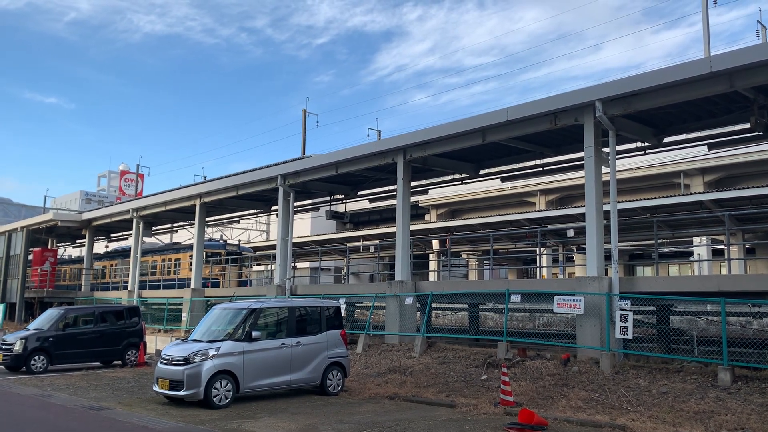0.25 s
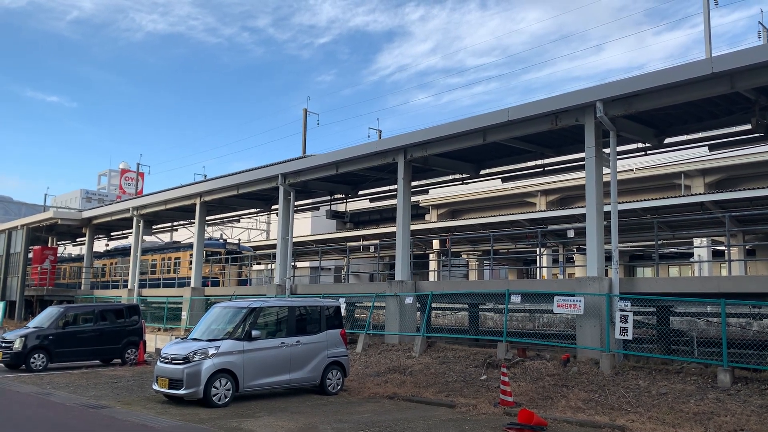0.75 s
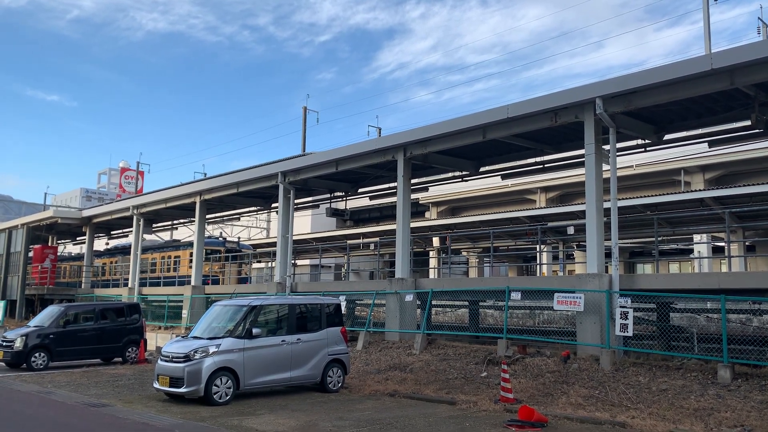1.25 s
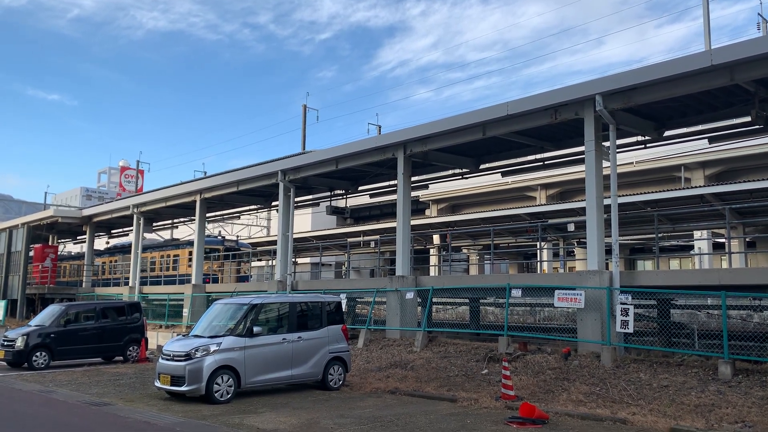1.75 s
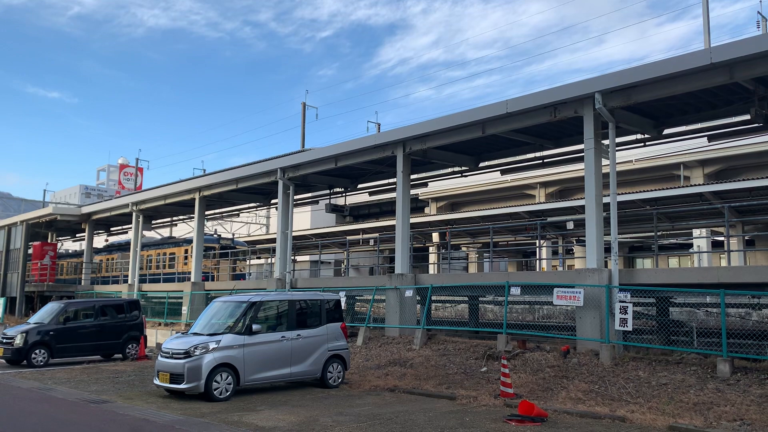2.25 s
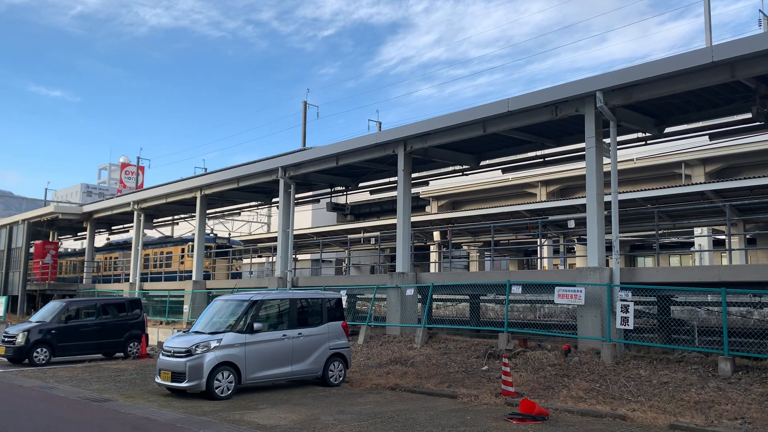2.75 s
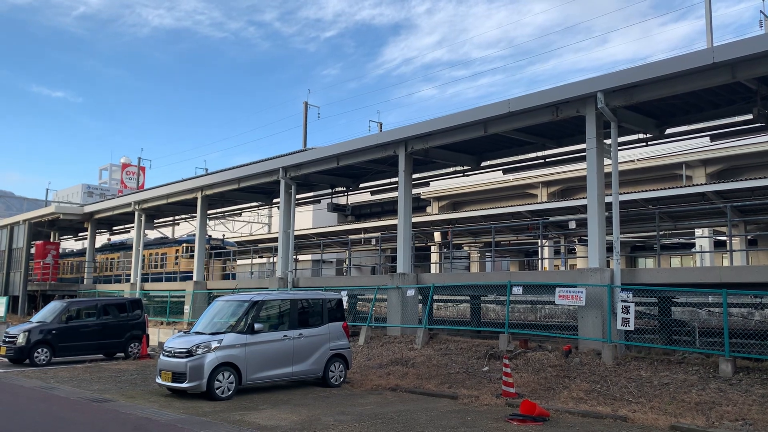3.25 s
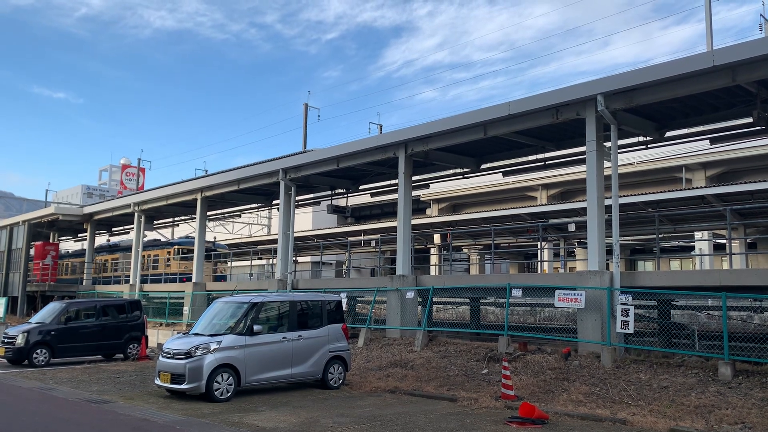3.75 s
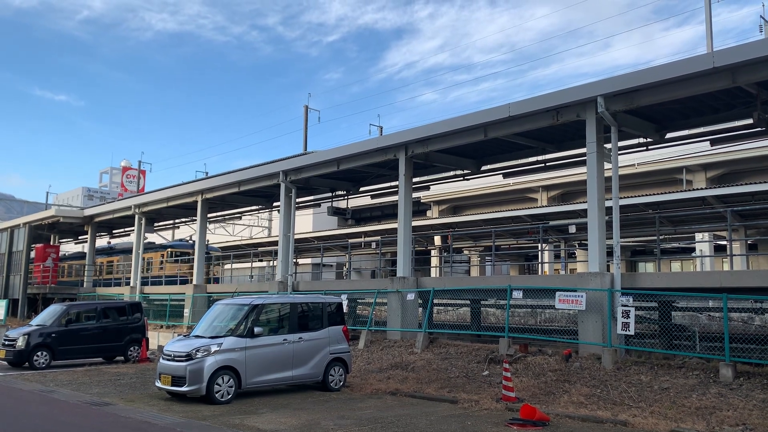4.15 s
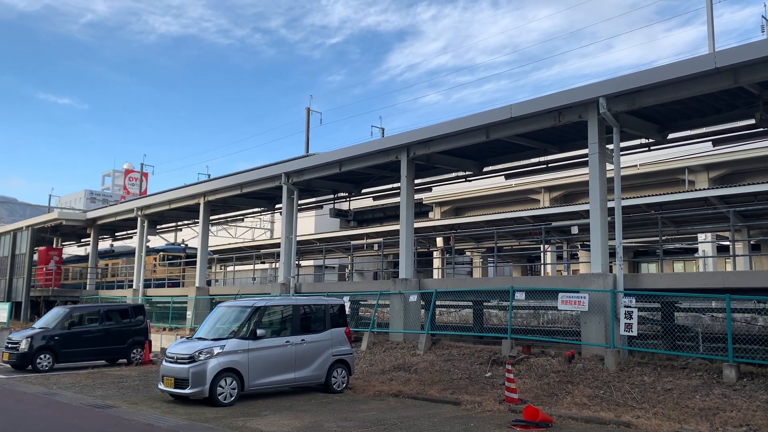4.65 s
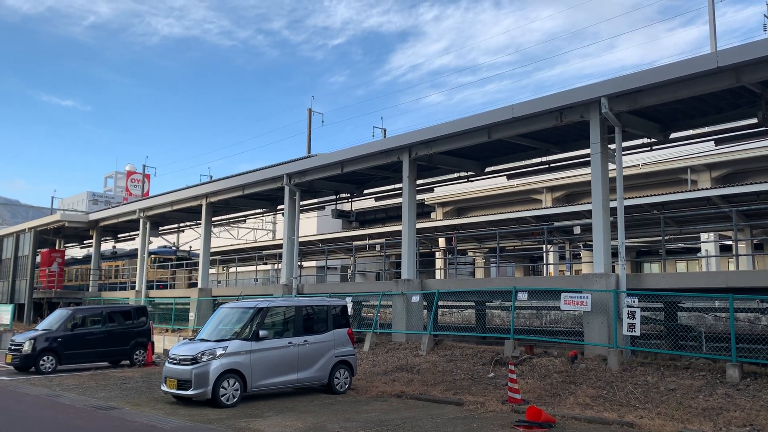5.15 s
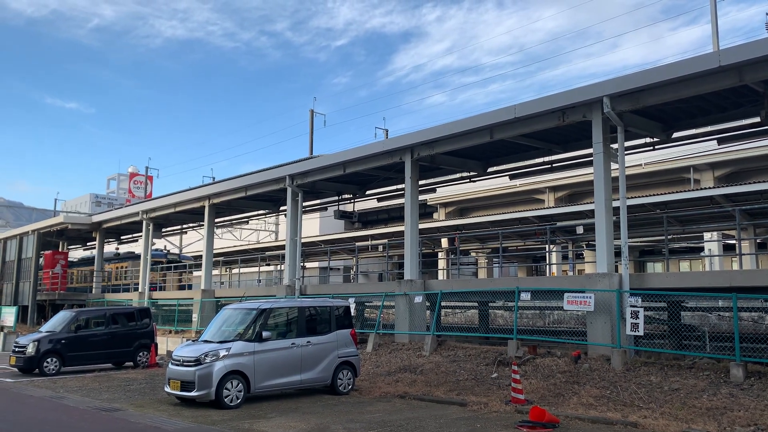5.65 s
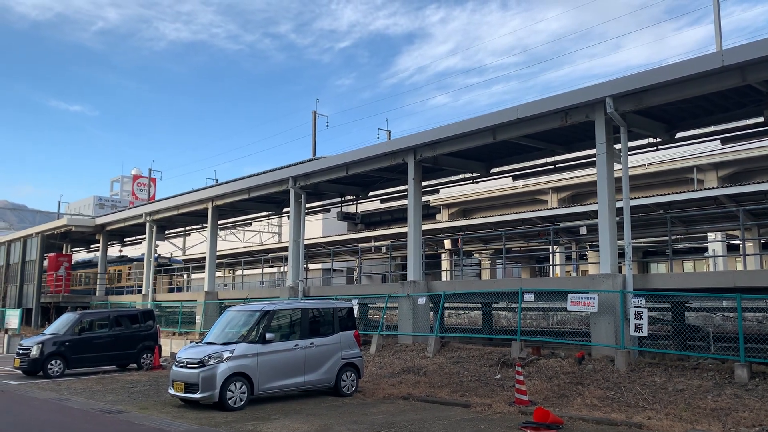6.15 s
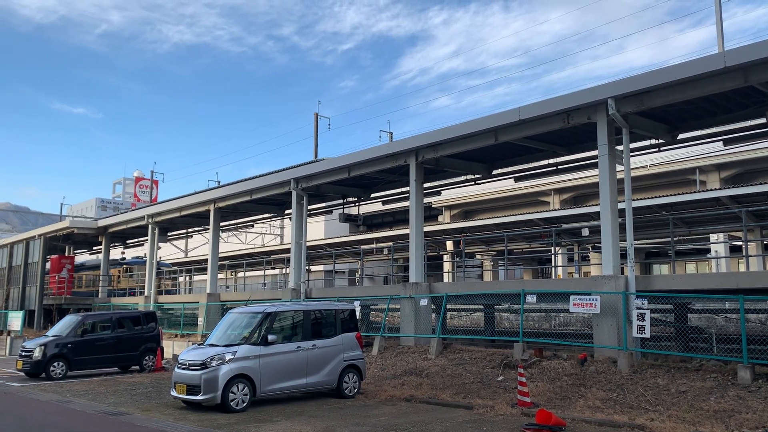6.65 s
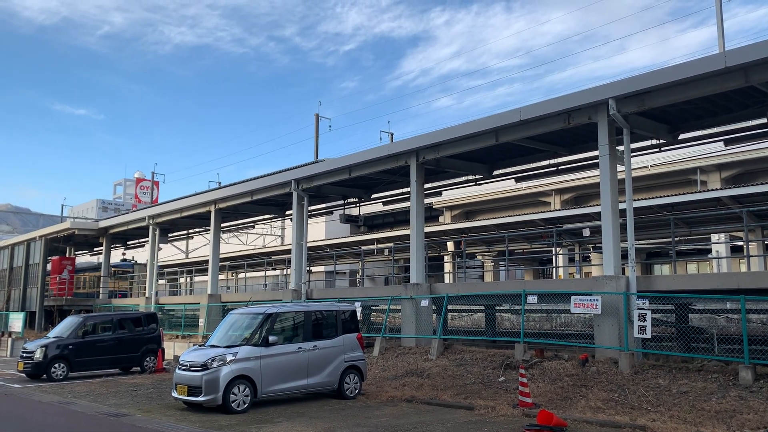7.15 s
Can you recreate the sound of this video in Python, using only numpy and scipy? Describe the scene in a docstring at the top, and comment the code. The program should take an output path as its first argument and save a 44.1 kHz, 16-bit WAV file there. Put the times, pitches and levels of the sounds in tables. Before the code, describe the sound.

An electric train stands at an open platform, heard from across a car park. For the whole seven and a half seconds its machines give a low fan roar and a mid-low electrical hum that wavers in strength. Wind buffets the microphone with low thumps, strongest in the first 0.7 seconds, again from about 1.5 to 2 and near 2.7, then in lighter gusts. A faint, high brake squeal and thin electrical whine are there from the start and die away by about 2.4 seconds. A car's indicator relay ticks softly and evenly throughout, about three alternating ticks and tocks a second. Small, distant metal clicks come at around 0.3, 1.1, 2.9, 5 and 7.1 seconds. A very faint air leak begins near 5.9 seconds, and between 6.6 and 7.1 a brake valve vents four short, soft puffs, the last ones brighter and stronger.

```python
"""An open platform, heard across a car park. An electric train has just braked: its machines hum and roar,
the pads' squeal on the discs dies away, and later a brake valve blows off air in short puffs.
A waiting car's indicator relay ticks and metal clicks now and then. Wind buffets the phone's
microphone, which keeps its bass in mono."""
import sys
import numpy as np
from scipy import signal
from scipy.fft import rfft, irfft, next_fast_len
from scipy.io import wavfile
from scipy.ndimage import uniform_filter1d, map_coordinates

SR = 44100
rng = np.random.default_rng(int(sys.argv[2]) if len(sys.argv) > 2 else 0)


def inscribe(sig):
    """Save sig as 16-bit PCM at rate SR to the path in sys.argv[1].

    A 1-D sig is mono; a 2-D sig holds one channel per row.
    Samples are clipped to [-1, 1] before scaling.
    """
    pcm = np.round(np.clip(np.atleast_2d(sig).T, -1, 1) * 32767)
    wavfile.write(sys.argv[1], SR, pcm.astype(np.int16))


N = 326057
TIME_S = np.arange(N) / SR

# strongest hum tone (time [s], tone [dB], octave [dB])
HUM_LEVELS = [(0, -47.5, -60), (.4, -39.5, -59.5), (1.01, -37.5, -53.5), (1.8, -38.5, -53),
              (2.22, -42.5, -51.5), (2.7, -42, -65.5), (3.04, -44.5, -66), (3.21, -55.5, -65),
              (3.42, -35, -60.5), (3.66, -39, -63.5), (4.05, -40, -59), (4.42, -44.5, -56.5),
              (4.6, -67, -64), (4.96, -47, -65.5), (5.12, -64, -72.5), (5.4, -45, -68.5),
              (5.86, -46.5, -59.5), (5.97, -40.5, -56), (6.07, -63, -61), (6.2, -45.5, -67),
              (6.36, -40.5, -63), (6.83, -42, -71.5), (6.9, -60, -56), (7.02, -46, -61), (7.39, -40.5, -64)]
# noise around that tone (time [s], level [dB])
HUM_FUZZ = [(0, -50), (1.8, -50), (2, -47.5), (2.2, -41.5), (2.35, -38.5), (2.55, -48.5), (2.7, -49),
            (2.9, -65), (3.5, -46.5), (7.39, -54)]


def amp(db):
    """dB to gain."""
    return 10 ** (np.asarray(db) / 20)


def unit(x):
    """x at rms 1."""
    return x / np.sqrt(np.mean(x ** 2) + 1e-20)


def along(points, hz):
    """Interpolate (frequency [Hz], value) points on a log axis."""
    knots_hz, values = np.transpose(points)
    return np.interp(np.log(hz + 1), np.log(knots_hz + 1), values)


def curves(rows):
    """One value per sample for each column after the time."""
    knots_s, *columns = np.transpose(rows)
    return [np.interp(TIME_S, knots_s, column) for column in columns]


def wobble(rate_hz):
    """Smooth random curve, rate_hz knots a second."""
    return map_coordinates(rng.standard_normal(int(N * rate_hz / SR) + 4), [TIME_S * rate_hz])


def filtered(x, response):
    """Apply a complex frequency response."""
    size = next_fast_len(N + SR // 2)
    return irfft(rfft(x, size) * response(np.fft.rfftfreq(size, 1 / SR)), size)[..., :N]


def resonances(modes, causal=False):
    """Squared resonators (centre [Hz], width [Hz], gain [dB]); causal ones ring only after a blow."""
    def peak(hz, centre_hz, width_hz):
        band = 1j * hz * width_hz / (centre_hz ** 2 - hz ** 2 + 1j * hz * width_hz)
        return (band if causal else abs(band)) ** 2
    return lambda hz: sum(amp(db) * peak(hz, centre, width) for centre, width, db in modes)


def rush(colour, patchy_db):
    """Two coloured noises, rms 1, with random gain patches in time and frequency."""
    spectra = signal.stft(rng.standard_normal((2, N)), nperseg=512)[2]
    patches = uniform_filter1d(rng.standard_normal(spectra.shape[1:]), size=5, axis=0)
    patches = unit(uniform_filter1d(patches, size=12, axis=1))
    noise = signal.istft(spectra * amp(patchy_db * patches), nperseg=512)[1][:, :N]
    return unit(filtered(noise, colour))


def even_noise(spectrum, span_s):
    """Coloured noise, rms 1, its level evened out over span_s."""
    noise = filtered(rng.standard_normal(N), lambda hz: amp(along(spectrum, hz)))
    size = int(span_s * SR)
    power = np.abs(uniform_filter1d(uniform_filter1d(noise ** 2, size), size))
    return unit(noise / np.sqrt(power + 0.057 * np.mean(noise ** 2)))


def bursts(rows, crack_t60_s, tail_gain):
    """Stereo noise cracks with tails, at (time [s], level [dB], tail t60 [s])."""
    x, t = np.zeros((2, N + SR)), np.arange(SR // 4) / SR
    for s, db, t60_s in rows:
        decay = amp(-60 * t / crack_t60_s) + tail_gain * amp(-60 * t / t60_s)
        envelope = amp(db) * decay * (1 - np.exp(-t / .001))
        x[:, round(s * SR):][:, :len(t)] += envelope * rng.standard_normal((2, len(t)))
    return x[:, :N]


def wind():
    """Lumpy buffeting, eddies that push the membrane for a cycle or two, and ripping gust edges."""
    # gust strength (time [s], thud [dB], flutter [dB])
    gusts = [(0, -21, -29), (.1, -27, -27), (.3, -28.5, -34), (.6, -32.5, -38.5), (.8, -48.5, -62),
             (1.05, -51, -49), (1.4, -36.5, -37.5), (1.6, -42.5, -40.5), (2, -37, -42.5),
             (2.5, -41.5, -41.5), (2.9, -39, -45), (3.3, -43.5, -58), (3.55, -38, -41), (3.9, -42, -42.5),
             (4.4, -42, -47.5), (4.75, -43.5, -44.5), (5, -34.5, -48), (5.15, -42, -68), (5.35, -38.5, -62),
             (5.9, -50.5, -50), (6.2, -39.5, -51), (6.4, -37, -45), (6.7, -40, -60), (6.95, -32.5, -58),
             (7.05, -47, -55), (7.2, -36, -42), (7.39, -49, -49)]
    # single eddies (time [s], level [dB], pitch [Hz], stirred flutter [dB])
    eddies = [(0.006, -7.5, 196, -28), (0.011, -17, 70.6, -28), (0.032, -10, 63, -16.5),
              (0.039, -13.5, 206, -35), (0.069, -10.5, 140, -31), (0.09, -14.5, 190, -26),
              (0.124, -15, 130, -40), (0.18, -12.5, 139, -28), (0.203, -24, 150, -36),
              (0.227, -16, 80, -30), (0.272, -14, 86, -41), (0.39, -18.5, 70.5, -37),
              (0.466, -19.5, 149, -36), (0.529, -27, 74, -44), (0.589, -22, 88, -37), (0.711, -19, 72, -36),
              (1.469, -15, 60, -34.5), (1.484, -20, 140, -43), (1.492, -19.5, 55, -44),
              (1.688, -24, 69.6, -41.5), (1.788, -15.5, 69, -44), (1.852, -13, 62, -23.5),
              (1.93, -23, 68.8, -46), (2.401, -23, 131, -53), (2.54, -27, 59.6, -46),
              (2.715, -21, 96, -34.5), (2.79, -23, 59, -48), (2.816, -26, 70, -53), (3.414, -33, 64.3, -39),
              (3.5, -25, 69.5, -49), (3.535, -27, 61.6, -52), (4.94, -24.5, 72, -54), (5.262, -29, 69, -57),
              (6.29, -30, 65, -45), (6.86, -31, 83, -44), (6.919, -26.5, 76, -42)]
    # thud and flutter spectra (frequency [Hz], relative density [dB])
    thud_spectrum = [(15, -35), (35, -8.5), (50, -0.5), (65, 10), (90, 3), (130, -18), (250, -55.5),
                     (600, -120)]
    flutter_spectrum = [(25, -120), (50, -45), (90, -9), (130, 0.5), (200, -11), (300, -11.5), (450, -34.5),
                        (900, -82), (2500, -120)]
    # gust edges (time [s], level before filtering [dB], tail t60 [s])
    edges = [(0.034, -21.5, 0.05), (0.102, -29, 0.024), (0.135, -31.5, 0.024), (0.163, -34, 0.037),
             (0.229, -32.5, 0.06), (0.323, -33.5, 0.03), (2.249, -38, 0.03), (2.35, -37, 0.03)]
    thud_db, flutter_db = curves(gusts)
    lumps_db = 2.5 * wobble(30) + 2.2 * wobble(9)
    flutter_gain = amp(flutter_db + 2.2 * wobble(12))
    thuds = amp(thud_db + lumps_db) * even_noise(thud_spectrum, span_s=0.081)
    stir = np.hanning(int(0.047 * SR))
    for (s, db, hz, stir_db), phase in zip(eddies, rng.random(len(eddies))):
        cycles = np.arange(0, 2.2, hz / SR)
        push = np.hanning(len(cycles)) * np.sin(2 * np.pi * (cycles + phase))
        thuds[round(s * SR):][:len(push)] += amp(db) * push
        flutter_gain[round(s * SR):][:len(stir)] += amp(stir_db) * stir
    flutter = flutter_gain * even_noise(flutter_spectrum, span_s=0.033)
    rip_colour = resonances([(397, 250, 22.1), (630, 120, 13), (1110, 270, 2.1)])
    rips = bursts(edges, crack_t60_s=0.034, tail_gain=0.081)
    rips = filtered(rips, lambda hz: rip_colour(hz) / (1 + (hz / 1500) ** 4))
    return thuds + flutter + rips[0] + 0.35 * rips


def hum():
    """Train machine tones, wavering as if echoed off roof and pillars, over a slow machine's throb."""
    hum_hz, sag_hz_per_s, throb_hz = 351, 0.43, 34.4
    tone_db, octave_db = curves(HUM_LEVELS)
    fuzz_db, = curves(HUM_FUZZ)
    phase = 2 * np.pi * np.cumsum(hum_hz - sag_hz_per_s * TIME_S + 0.618 * wobble(4)) / SR
    phase += 1.1 * amp(fuzz_db - fuzz_db.max()) * wobble(45)  # shakier where the fuzz is strong

    def tone(ratio, db, drift_rad):
        gain = np.sqrt(2) * amp(db + 0.65 * wobble(30))
        return gain * np.sin(ratio * phase + drift_rad * wobble(2.5) + 0.39 * wobble(25))

    antiphase = tone(0.99, -52.5 + 2.2 * wobble(3), drift_rad=.8) * [[1], [-1]]
    octave = np.array([tone(2, octave_db + 2.4 * wobble(8) + 2 * wobble(35), drift_rad=.9) for _ in "LR"])
    throb_gain = np.sqrt(2) * amp(-47 + 1.5 * wobble(3))
    throb = throb_gain * np.sin(2 * np.pi * throb_hz * TIME_S + .5 * wobble(2))
    main = tone(1, tone_db + 1.2 * wobble(8.9), drift_rad=0.18)
    return throb + main + antiphase + octave * amp([[2], [-2]])


def machinery():
    """Broad machine roar and a far hiss, with a faint, even treble beneath them."""
    # background (time [s], roar [dB], hiss [dB])
    levels = [(0, -40, -52.5), (.7, -40.5, -54), (1.1, -38, -55), (2, -39, -57), (2.9, -39.5, -56.5),
              (3.3, -38.5, -57), (4, -39.5, -56.5), (5, -38.5, -56), (5.4, -39, -56.5), (6.3, -39.5, -57.5),
              (7.39, -41, -55)]
    # roar, hiss and treble spectra (frequency [Hz], relative density [dB])
    roar_spectrum = [(18, -46), (32, -25.5), (46, -1), (71, -2.5), (156, -7.5), (210, -10.5), (267, -6.5),
                     (306, -12), (359, -10.5), (483, -16), (704, -16.5), (777, -19), (1200, -21),
                     (1410, -32), (2500, -38), (3250, -78.5), (5500, -120)]
    hiss_spectrum = [(500, -120), (900, -30.5), (1400, 5), (2400, 0), (3300, -6), (4600, -9), (5600, -16.5),
                     (7000, -19.5), (8000, -36.5), (10000, -120)]
    treble_spectrum = [(5500, -120), (7000, -11), (8000, -2.5), (9500, -1.5), (11000, -3.5), (13000, -3.5),
                       (15700, -6.5)]
    roar_db, hiss_db = curves(levels)
    roar = amp(roar_db + 0.67 * wobble(5)) * rush(lambda hz: amp(along(roar_spectrum, hz)), patchy_db=1.5)
    hiss = amp(hiss_db + .3 * wobble(6)) * rush(lambda hz: amp(along(hiss_spectrum, hz)), patchy_db=.6)
    treble = amp(-78) * rush(lambda hz: amp(along(treble_spectrum, hz)), patchy_db=1)
    return roar + hiss + treble


def fuzzy_tones():
    """Narrow noise bands: fuzz around the hum, fan tones and weaker hum tones."""
    # fan tones (centre [Hz], width [Hz], level [dB])
    fan_bands = [(142.5, 9.2, -49.5), (2953, 160, -71), (5000, 110, -85.5)]
    # weaker hum tones (centre [Hz], level [dB])
    weak_bands = [(175, -54), (524, -64), (873, -59.5), (1047, -72)]
    fuzz = amp(curves(HUM_FUZZ)[0]) * rush(resonances([(349.3, 68, 0)]), patchy_db=1.5)
    fans = sum(amp(db + 0.69 * wobble(1.2)) * rush(resonances([(hz, width_hz, 0)]), patchy_db=3)
               for hz, width_hz, db in fan_bands)
    weak = sum(amp(db) * rush(resonances([(hz, 20, 0)]), patchy_db=2.6) for hz, db in weak_bands)
    _, octave_db = curves(HUM_LEVELS)
    weak *= amp(0.12 * (octave_db - octave_db.mean()))  # swells slightly with the octave
    return fuzz + fans + weak


def electrical_whine():
    """Thin, wavering electrical tones that die away after the stop."""
    # whines (pitch [Hz], relative level [dB])
    tones = [(2320, -2), (4930, -6)]
    # their fade (time [s], level [dB])
    fade = [(0, -64), (.6, -66), (.9, -70), (1.8, -72), (2.4, -91), (2.6, -120)]
    waver_hz = 28
    whine = 0
    for hz, db in tones:
        gain = amp(db + 2.9 * wobble(34))
        whine += gain * np.sin(2 * np.pi * np.cumsum(hz + waver_hz * wobble(60)) / SR)
    return amp(curves(fade)[0]) * whine * [[1], [.7]]


def main_fan():
    """The main fan's drone, a tone smeared by slow noise."""
    # drone (time [s], level [dB])
    levels = [(0, -33), (.31, -47.5), (1.2, -40), (1.8, -44), (2.1, -52.5), (2.34, -41.5), (2.45, -52),
              (2.6, -44), (2.9, -47), (3.72, -41), (4.62, -56), (4.78, -42.5), (5.3, -42.5), (6.1, -48.5),
              (6.3, -45), (7.39, -49)]
    drone_hz, smear_hz = 268.9, 8
    waver = filtered(rng.standard_normal((2, 2, N)), lambda hz: 1 / (1 + (hz / smear_hz) ** 2))
    phase = 2 * np.pi * drone_hz * TIME_S
    return amp(curves(levels)[0]) * unit(waver[0] * np.cos(phase) + waver[1] * np.sin(phase))


def brake_squeal():
    """Rubbing pads excite the disc's narrow modes; the high ones come and go as the pads press."""
    # squeal (time [s], level [dB], relative high modes [dB], relative overtones [dB])
    levels = [(0, -53.5, -7, -13.5), (.13, -54.5, -8, -18), (.3, -49.5, 2, -20.5), (.4, -59, 8, -19.5),
              (.66, -62.5, 3, -15), (.9, -66.5, -5, -10.5), (1.12, -63, -2, -12), (1.28, -61.5, 0, -14.5),
              (1.36, -69, -8, -20.5), (1.7, -67.5, -2, -22.5), (1.92, -66.5, -13.5, -23),
              (2.4, -89.5, -16, -21)]
    # disc modes and their overtones (centre [Hz], width [Hz], gain [dB])
    disc_modes = [(6235, 65, -6), (6470, 110, -6), (6580, 100, -5), (6750, 60, 0), (7030, 90, -3),
                  (7180, 90, -2), (7300, 90, -7), (6750, 800, -11)]
    overtone_bands = [(11100, 1500, -6), (12200, 330, 5.5), (15200, 800, -2)]
    split_hz = 6900
    silence = (levels[-1][0] + .2, -120, -8, -20)
    level_db, high_db, overtone_db = curves(levels + [silence])
    ring = rush(lambda hz: resonances(disc_modes)(hz) / (1 + (hz / 7500) ** 40), patchy_db=2.6)
    low = filtered(ring, lambda hz: 1 / (1 + (hz / split_hz) ** 60))
    high = amp(high_db) * (ring - low)
    overtones = amp(overtone_db) * rush(resonances(overtone_bands), patchy_db=4)
    return amp(level_db + 1.1 * wobble(30)) * (low + high + overtones)


def relay():
    """Even tick-tock: the contact snaps shut, bounces, then falls open softer and duller."""
    # case modes (centre [Hz], width [Hz], gain [dB], left lead [rad])
    case_modes = [(2250, 700, 3, 1), (2950, 600, 2, 1.3), (3600, 600, 0, 1.3), (4300, 600, 1, 1),
                  (5120, 520, -1, .5), (5900, 450, -7, 1.8), (6750, 600, -1, .7)]
    # contact landing and rebounds (delay [s], relative level [dB])
    bounces = [(.0003, 0), (.0011, -1), (.003, -5), (.0055, -11)]
    start_s, period_s, tock_lag_s, right_bias_db = .2193, .66, .3398, 2.5
    ticks_s = np.arange(start_s, N / SR - tock_lag_s, period_s)
    sides = np.array([[1], [-1]])

    def case(hz):
        ring = sum(resonances([mode], causal=True)(hz) * np.exp(.5j * lead_rad * sides)
                   for *mode, lead_rad in case_modes)
        return ring * amp(-right_bias_db / 2 * sides)

    x = 0
    for times_s, db, top_hz in ((ticks_s, -21.5, 7500), (ticks_s + tock_lag_s, -27.5, 6500)):
        blows = np.zeros(N)
        for delay_s, bounce_db in bounces:
            at = np.round((times_s + delay_s) * SR).astype(int)
            blows[at] = amp(db + bounce_db + rng.normal(0, 2.1, len(at)))
        echoes = bursts([(s + .003, db - 27, .05) for s in times_s], crack_t60_s=.015, tail_gain=.5)
        x += filtered(blows + echoes, lambda hz: case(hz) / (1 + (hz / top_hz) ** 12))
    return x


def metal_clicks():
    """Far metal contacts: a noisy edge and a crunchy tail, each with its own ring and treble."""
    # contacts (time [s], level [dB], relative treble [dB], tail t60 [s], ring [Hz], relative ring [dB])
    hits = [(0.2786, -35, -20, 0.14, 3200, -9), (1.1151, -33, -8.5, 0.25, 2790, -9),
            (1.1323, -41.5, -5.5, 0.18, 3830, -10), (1.276, -41.5, -13.5, 0.16, 4670, -15),
            (1.293, -53.5, -7, 0.12, 4760, -10), (2.8515, -43, -8, 0.13, 4435, -8),
            (2.8604, -36, -20, 0.17, 2390, -10.5), (3.145, -48, -18, 0.13, 4435, -9),
            (5.032, -37, -17.5, 0.34, 3250, -11), (5.051, -56, -14, 0.1, 6800, 0),
            (5.247, -47, -13, 0.27, 2900, -10), (7.0987, -44.5, -21, 0.13, 2600, -1.5),
            (7.294, -60, -15, 0.129, 4480, -10)]
    # struck metal's modes (centre [Hz], width [Hz], gain [dB])
    steel_modes = [(2000, 1400, 1.5), (3010, 1300, 0.5), (4560, 220, -0.5), (6000, 1900, -1.5)]
    ring_t60_s = 0.095
    body = bursts([(s, db, t60_s) for s, db, _, t60_s, *_ in hits], crack_t60_s=.03, tail_gain=.25)
    treble = bursts([(s, db + treble_db, t60_s) for s, db, treble_db, t60_s, *_ in hits],
                    crack_t60_s=.05, tail_gain=.3)
    crunch = amp(2.6 * wobble(300))
    rings, t = np.zeros(N + SR), np.arange(SR // 10) / SR
    for s, db, _, _, hz, ring_db in hits:
        envelope = amp(db + ring_db - 60 * t / ring_t60_s) * (1 - np.exp(-t / 0.0011))
        rings[round(s * SR):][:len(t)] += envelope * np.sin(2 * np.pi * hz * t)
    body = filtered(crunch * body, resonances(steel_modes, causal=True))
    treble = filtered(crunch * treble, resonances([(9250, 2700, -1), (13000, 3900, -14)]))
    return body + treble + np.sqrt(crunch) * rings[:N] * [[1], [.3]]


def brake_valve():
    """Air leaks faintly, then vents in puffs; each puff's jet hardens and so brightens as it goes."""
    # valve puffs (time [s], level [dB], hold [s], initial hardness [0-1])
    puffs = [(6.64, -57.5, .06, .05), (6.767, -58.5, 0.061, 0), (6.836, -50, 0.057, 0.4),
             (6.957, -49, 0.04, 0.8)]
    attack_s, release_db_per_s, hardening_per_s = 0.011, 150, 1
    dull = rush(resonances([(2950, 1050, 4.5), (5970, 2600, 0), (12600, 9000, -38.5)]), patchy_db=1.3)
    sharp = rush(resonances([(3260, 6800, 12.5), (6800, 4100, -5.5), (13000, 9000, -13)]), patchy_db=1.3)

    def jet_power(start_s, db, hardness):
        gain = amp(db) * np.clip((TIME_S - start_s) / attack_s, 0, 1)
        return gain ** 2 * np.clip([1 - hardness, hardness], 0, 1)

    power = jet_power(start_s=5.85, db=-68, hardness=np.full(N, .1))  # the leak
    for start_s, db, hold_s, hardness in puffs:
        age_s = TIME_S - start_s
        fall_db = release_db_per_s * np.maximum(age_s - hold_s, 0)
        power += jet_power(start_s, db - fall_db, hardness + hardening_per_s * age_s)
    dull_gain, sharp_gain = np.sqrt(power)
    return dull_gain * dull + sharp_gain * sharp


def stereo_image(pair):
    """Make left and right partly alike, offset in phase and level."""
    # left-right likeness (frequency [Hz], coherence [0-1])
    likeness = [(60, 0.74), (250, 0.82), (450, 0.77), (700, 0.14), (1300, 0.3), (5000, 0.19), (6200, 0.24),
                (7500, 0.11), (8300, 0.99), (15700, 0.98)]
    # left-right phase offset (frequency [Hz], phase [rad])
    # its treble steps imitate audio coding and hollow the centre near 8.7 and 13.5 kHz
    phase_offset = [(0, 0), (1210, 1.8), (2500, 6.8), (2930, 7.1), (5250, 15.4), (6720, 18.6), (8300, 15.9),
                    (9100, 15.5), (10500, 12.7), (11500, 12.4), (12800, 9.6), (14100, 9.2), (15000, 6.4),
                    (16000, 6.2)]
    # left over right (frequency [Hz], level [dB])
    balance = [(60, -6.5), (110, -2.5), (200, 0.0), (380, 0.5), (700, 5.5), (1290, -0.5), (2380, -0.5),
               (4400, -1), (8120, -1), (15000, 1)]

    def blend(hz):
        angle_rad = np.arccos(np.clip(along(likeness, hz), 0, 1)) / 2
        return np.array([np.cos(angle_rad), np.sin(angle_rad)])

    def offset(hz):
        left = amp(along(balance, hz) / 2) * np.exp(.5j * np.interp(hz, *np.transpose(phase_offset)))
        return np.array([left, 1 / left])

    mid, side = filtered(pair, blend)
    return filtered(np.array([mid + side, mid - side]), offset)


def scene():
    """Far sounds share one stereo image; relay, hum and wind carry their own."""
    far = machinery() + fuzzy_tones() + electrical_whine() + main_fan()
    far += brake_squeal() + brake_valve() + metal_clicks()
    return stereo_image(far) + relay() + hum() + wind()


def record(dry):
    """The phone makes the bass mono below a moving edge and limits the band."""
    # mono bass limit (time [s], edge [Hz])
    mono_edge = [(0, 257), (1.2, 273), (2.3, 102.5), (2.7, 161), (4.2, 223), (4.4, 147), (5.5, 60),
                 (7.39, 45)]
    low_cut_hz, top_hz = 27, 15750
    bins_hz, frames_s, spectra = signal.stft((dry[0] - dry[1]) / 2, SR, nperseg=2048)
    edge_hz = np.interp(frames_s, *np.transpose(mono_edge))
    spectra /= 1 + (edge_hz / (bins_hz[:, None] + 1)) ** 10
    side = signal.istft(spectra, SR, nperseg=2048)[1][:N]
    mid = dry.mean(axis=0)
    stereo = np.array([mid + side, mid - side])
    return filtered(stereo, lambda hz: (hz < top_hz) / (1 + (low_cut_hz / (hz + 1)) ** 4))


dry = scene()
out = record(dry)
inscribe(out)
```